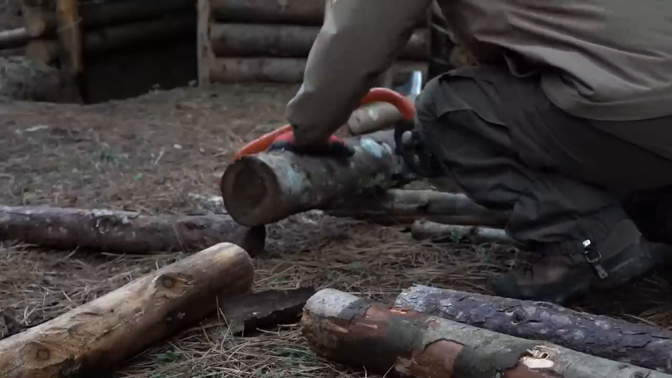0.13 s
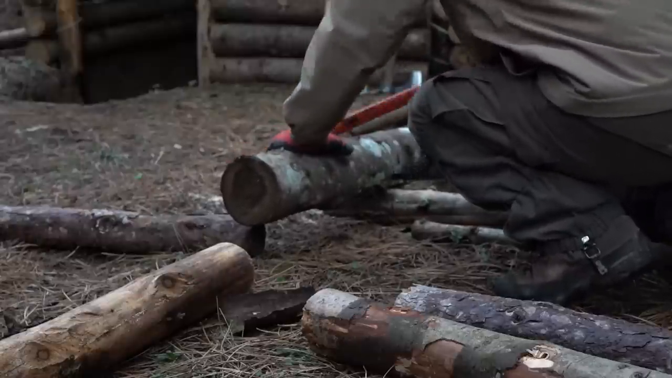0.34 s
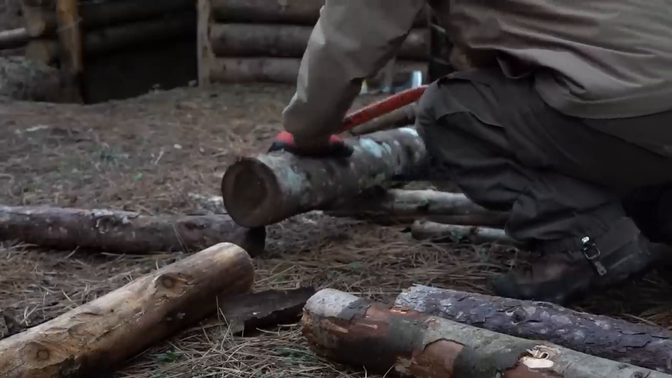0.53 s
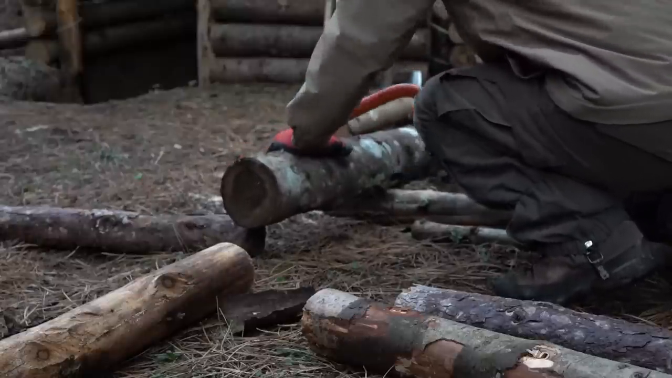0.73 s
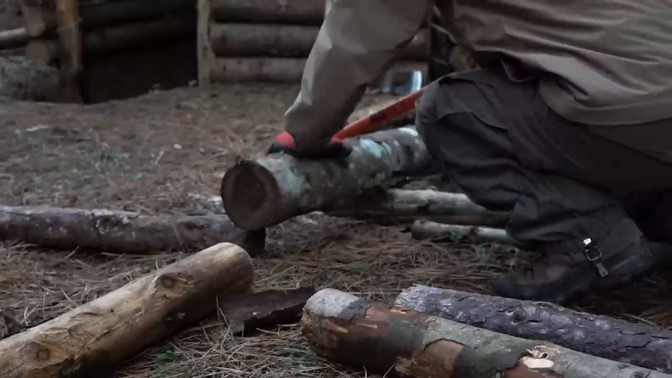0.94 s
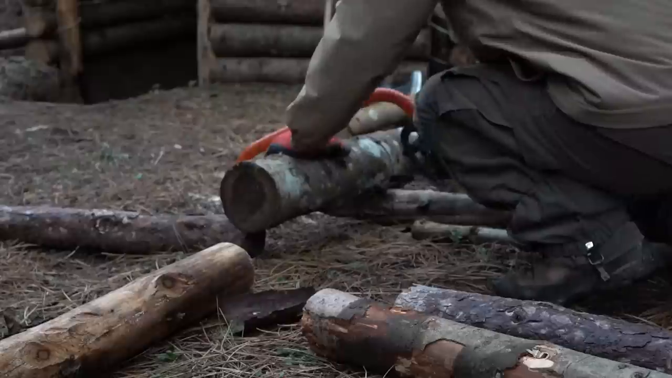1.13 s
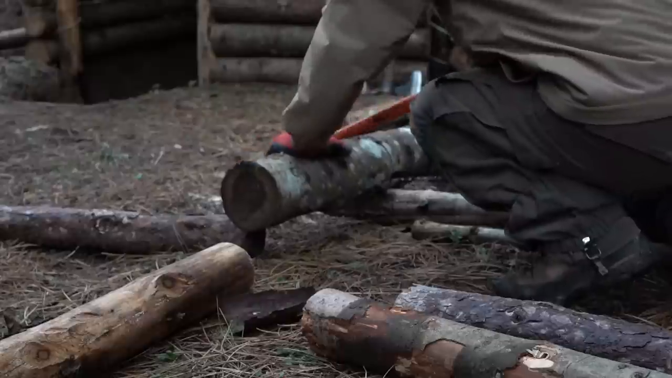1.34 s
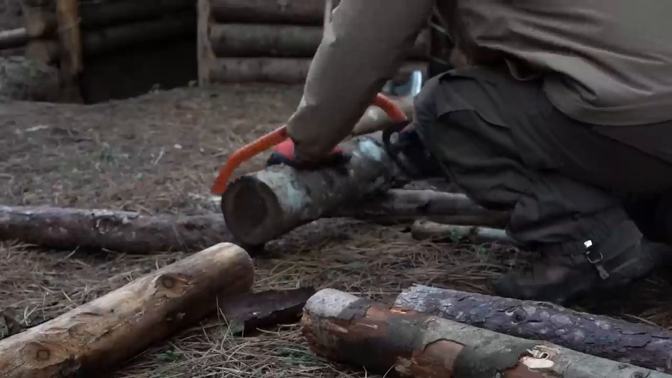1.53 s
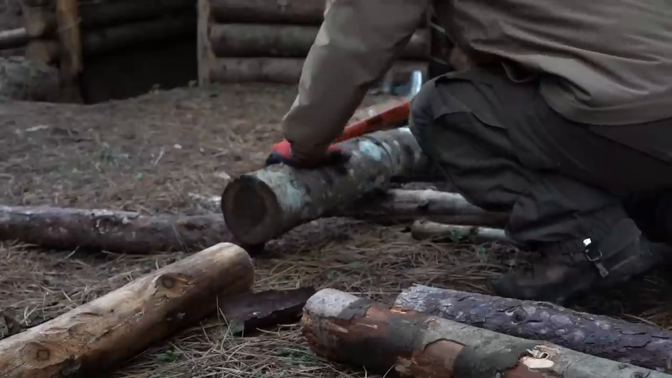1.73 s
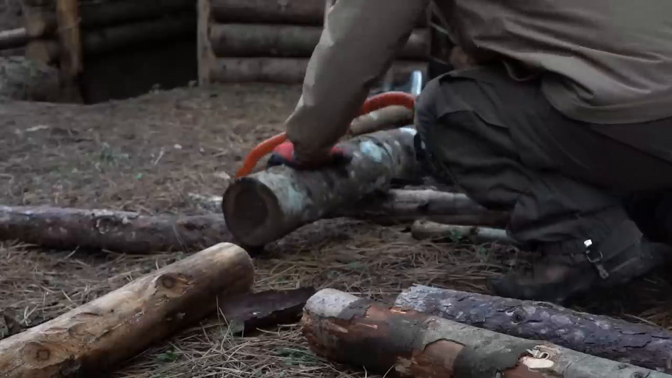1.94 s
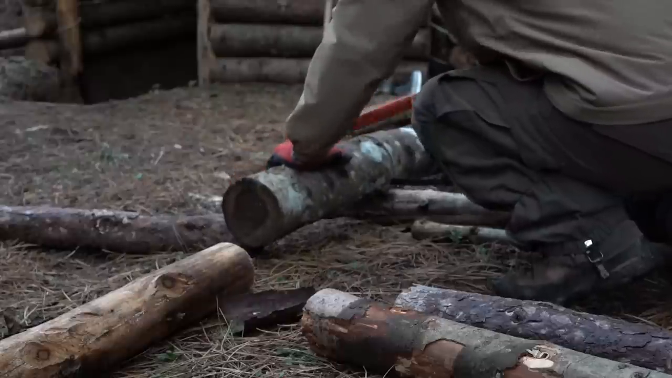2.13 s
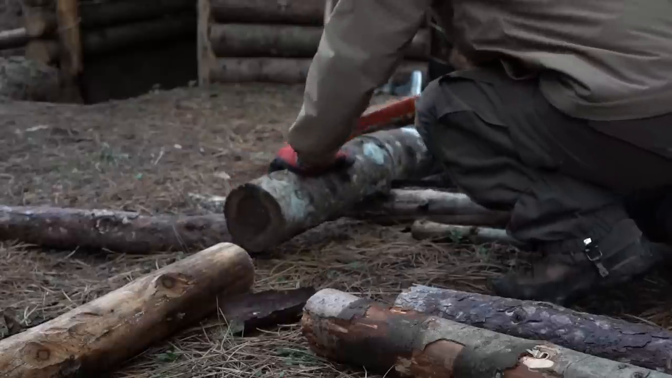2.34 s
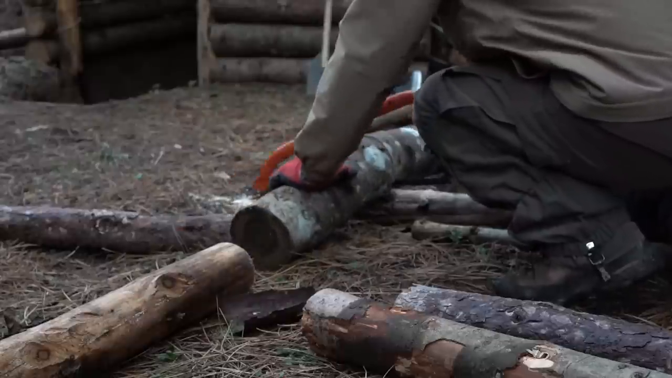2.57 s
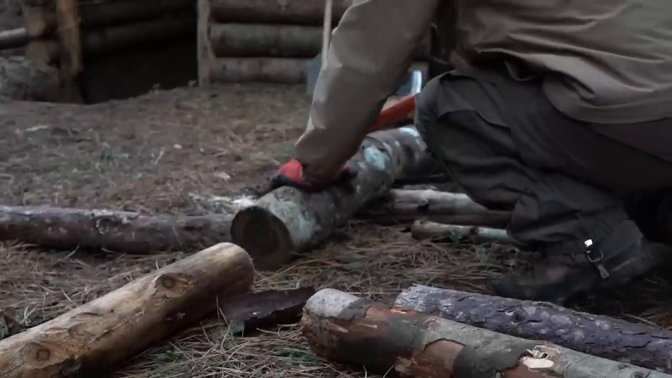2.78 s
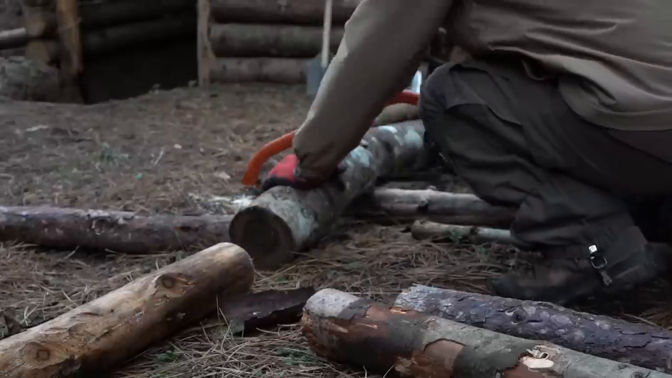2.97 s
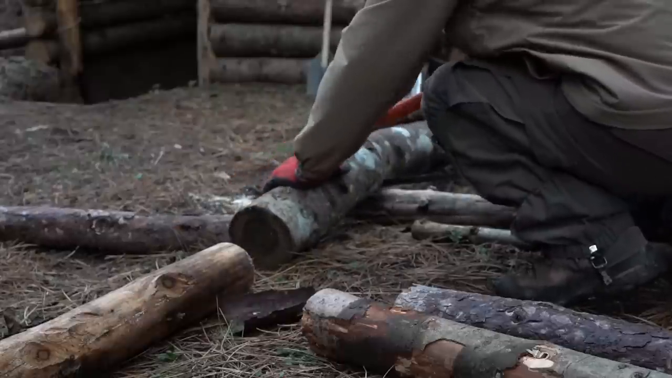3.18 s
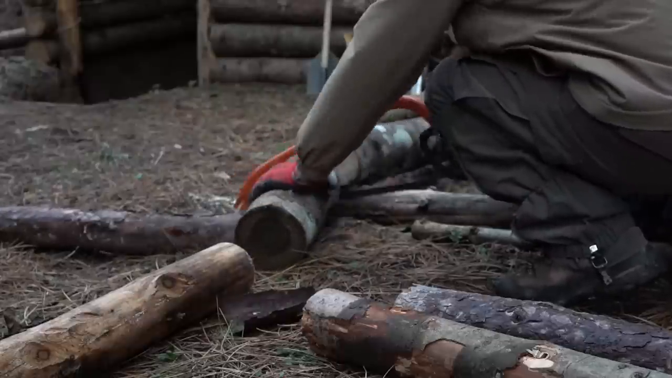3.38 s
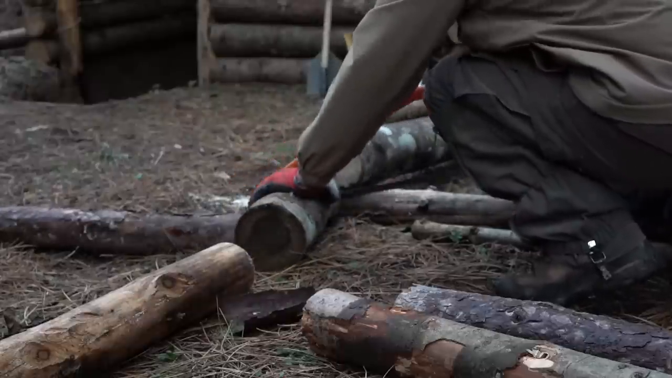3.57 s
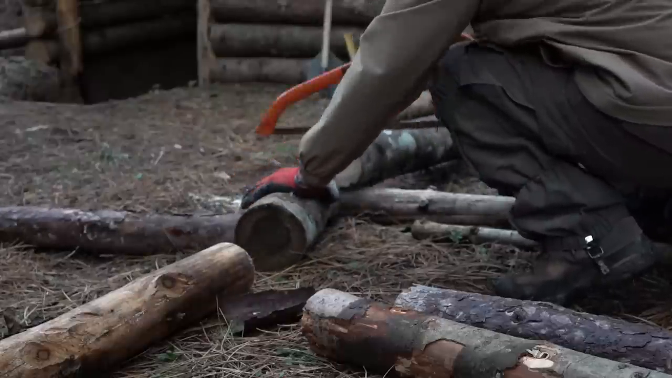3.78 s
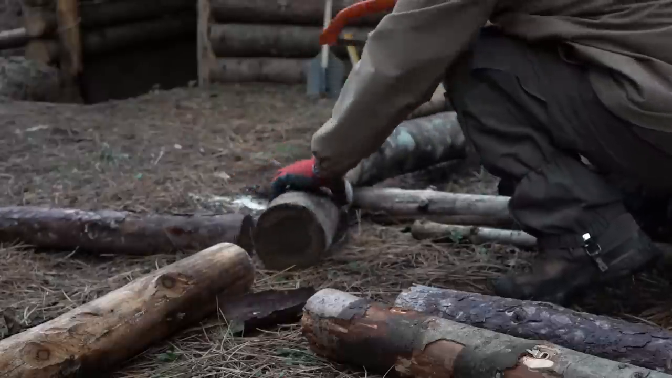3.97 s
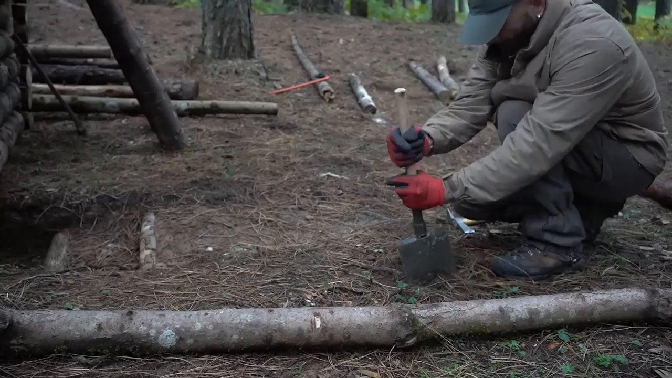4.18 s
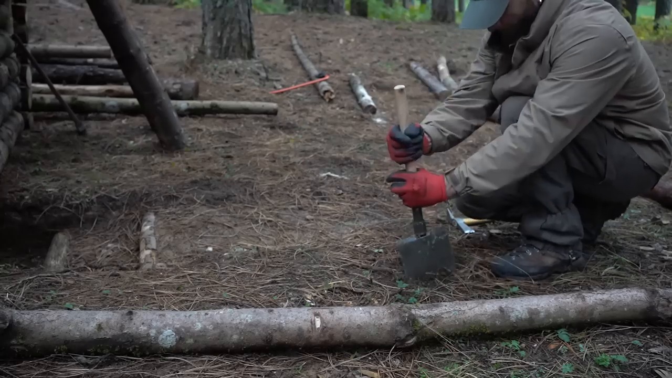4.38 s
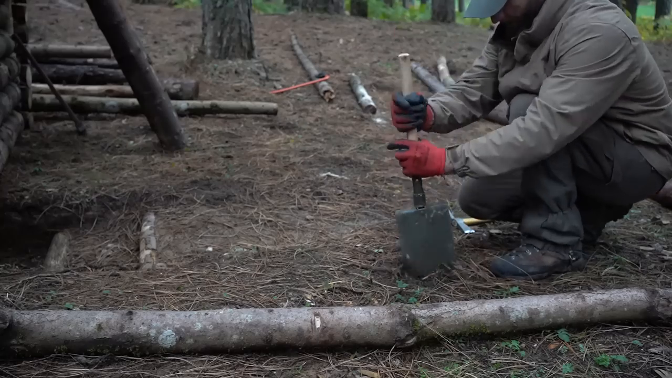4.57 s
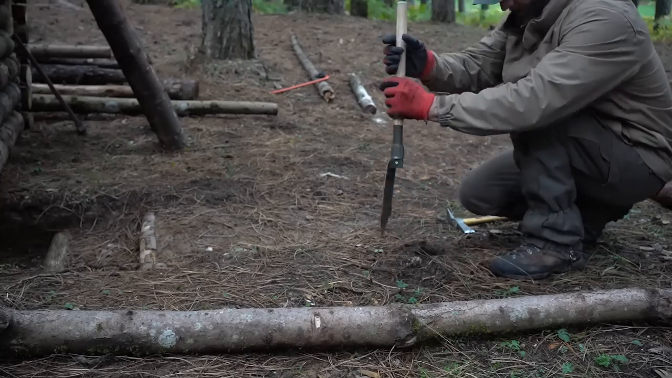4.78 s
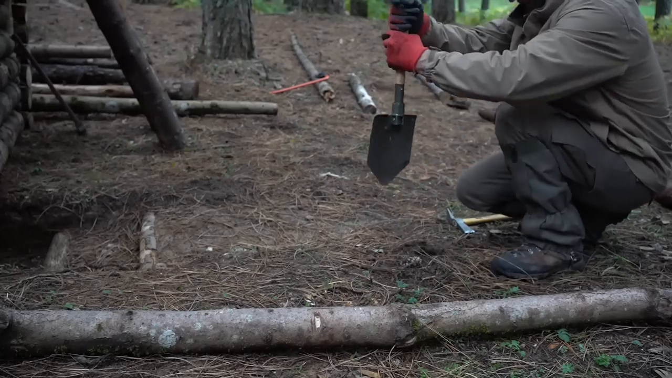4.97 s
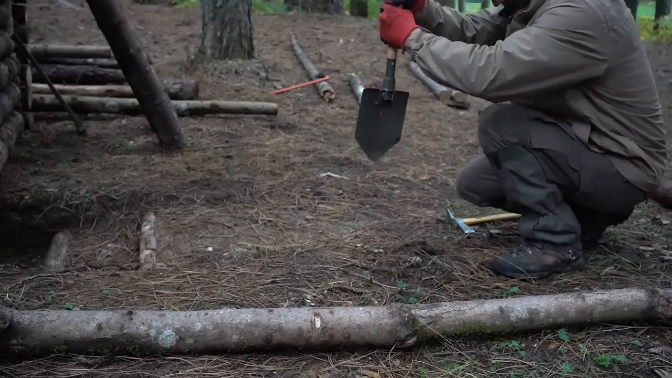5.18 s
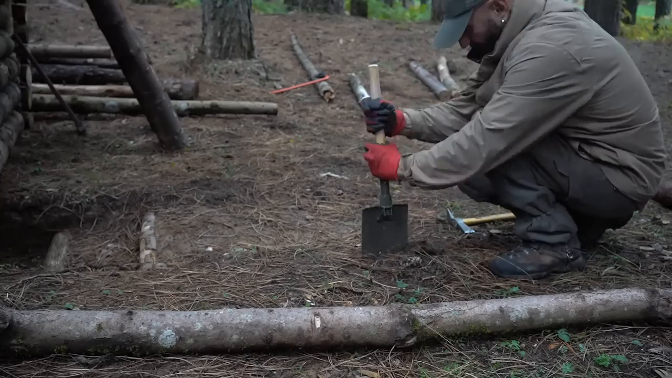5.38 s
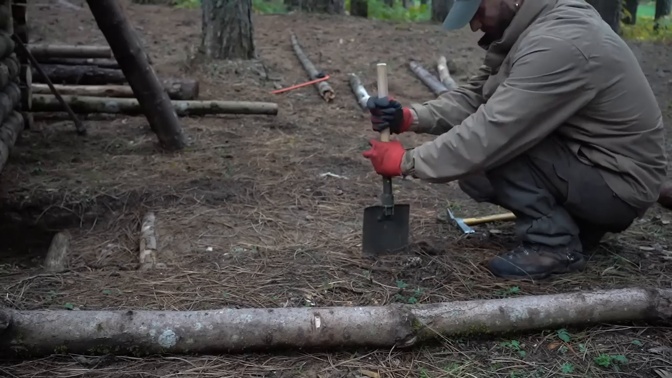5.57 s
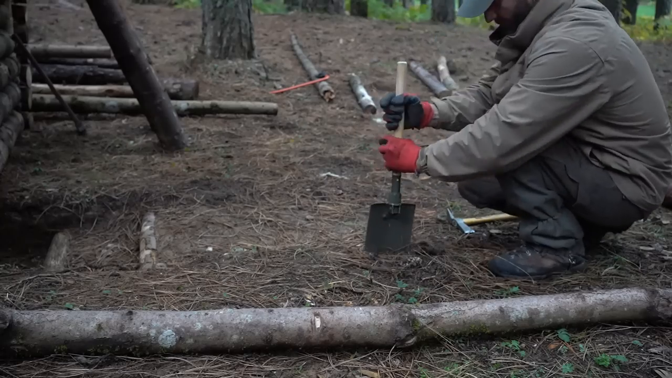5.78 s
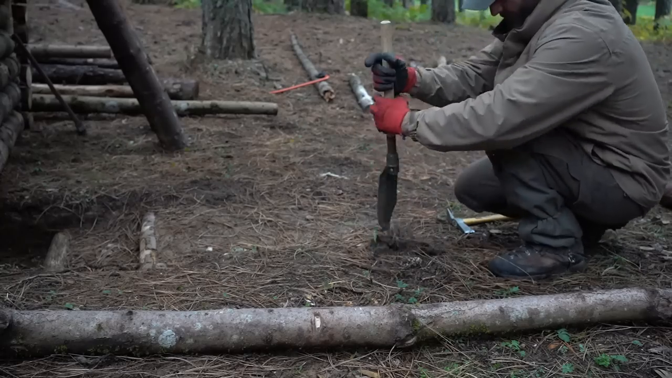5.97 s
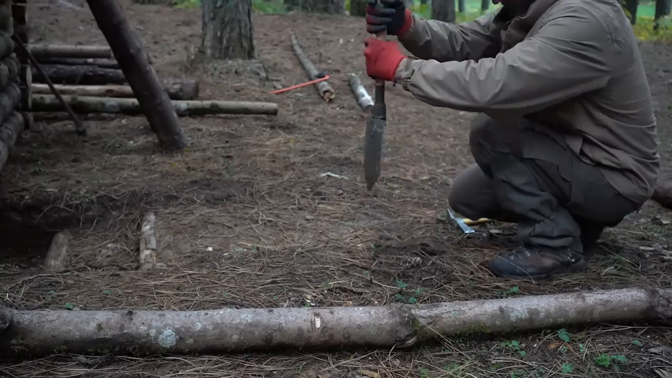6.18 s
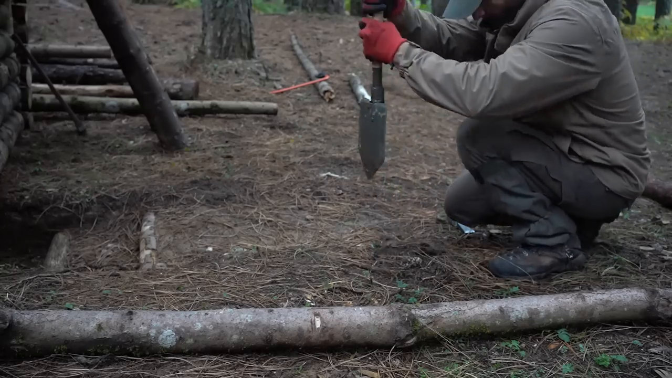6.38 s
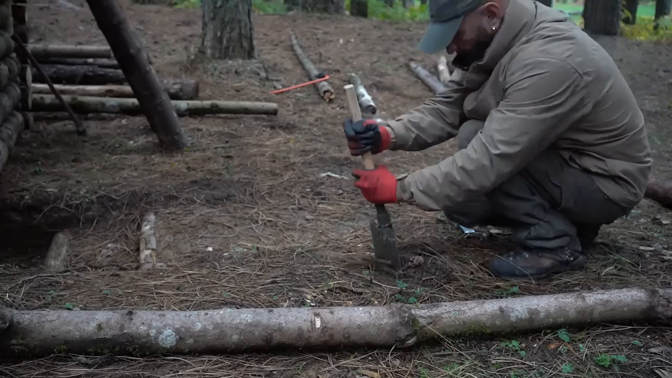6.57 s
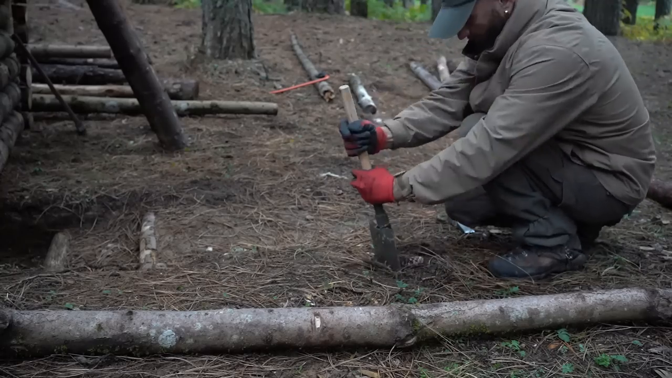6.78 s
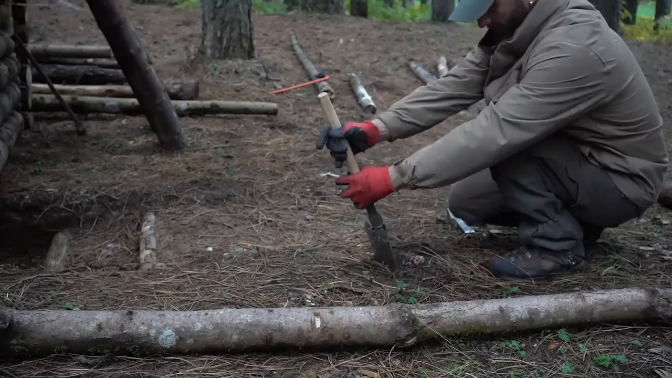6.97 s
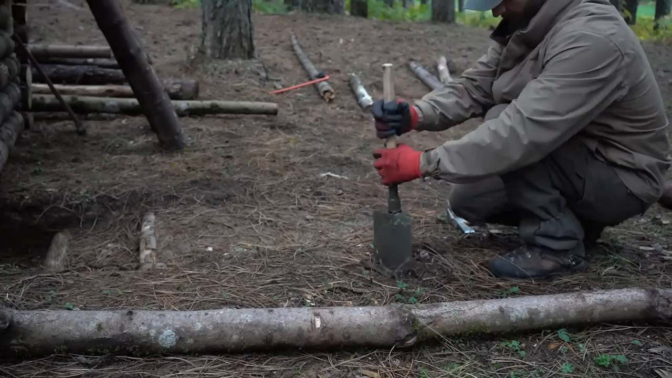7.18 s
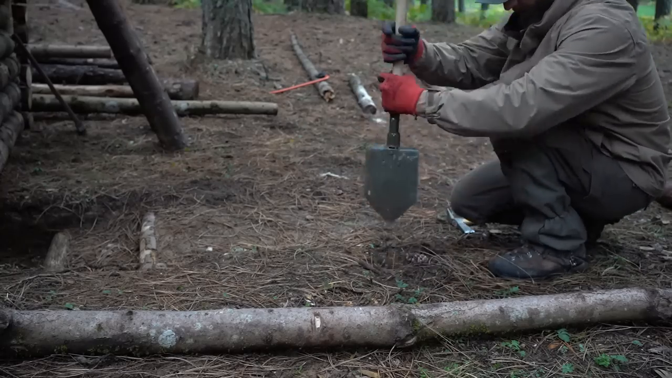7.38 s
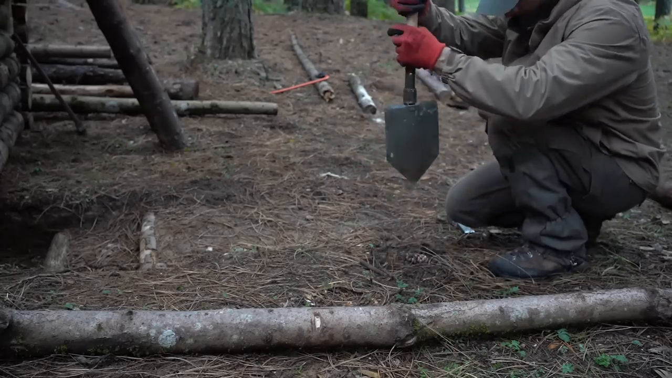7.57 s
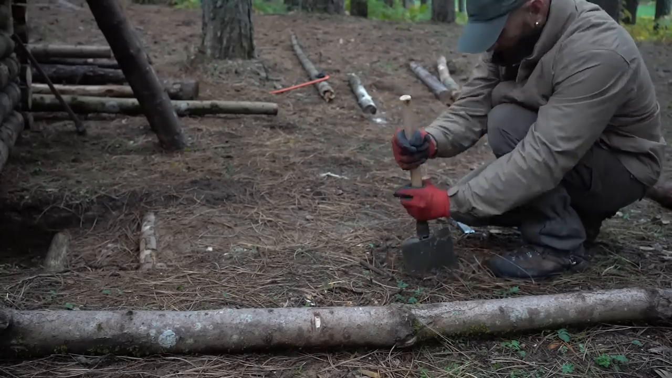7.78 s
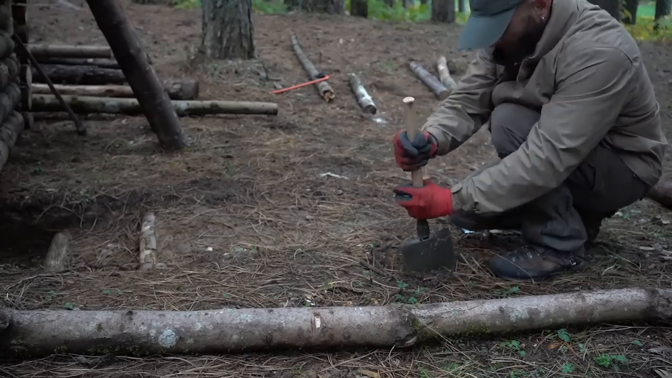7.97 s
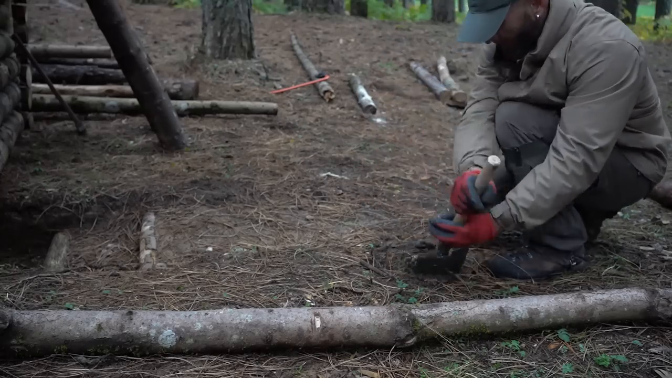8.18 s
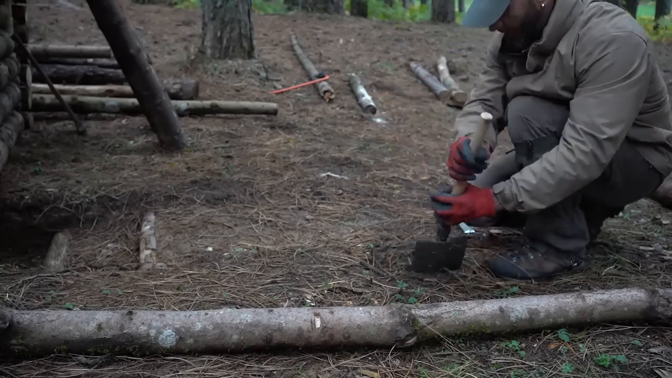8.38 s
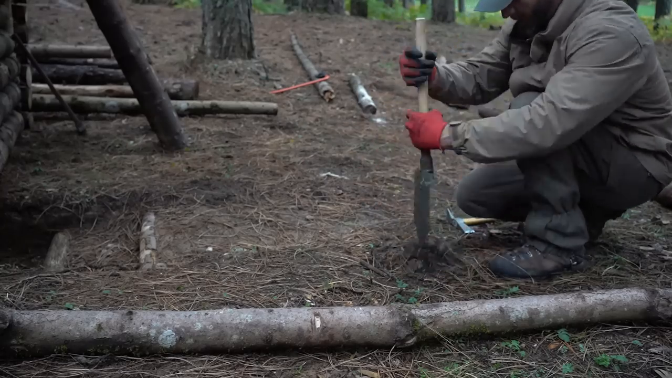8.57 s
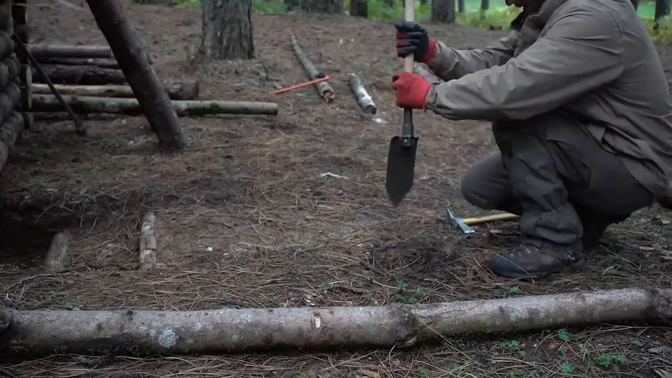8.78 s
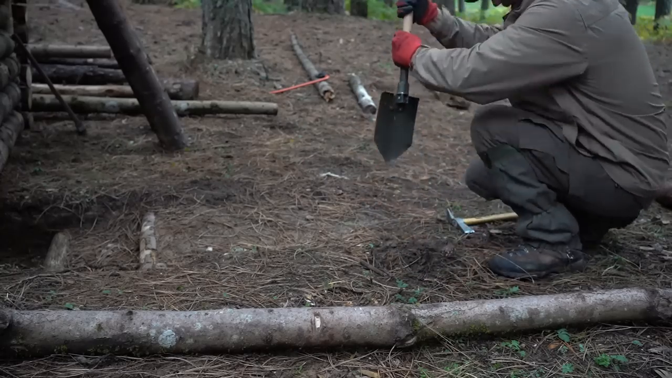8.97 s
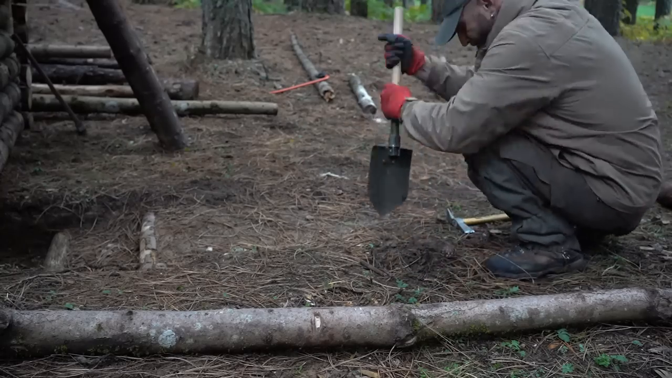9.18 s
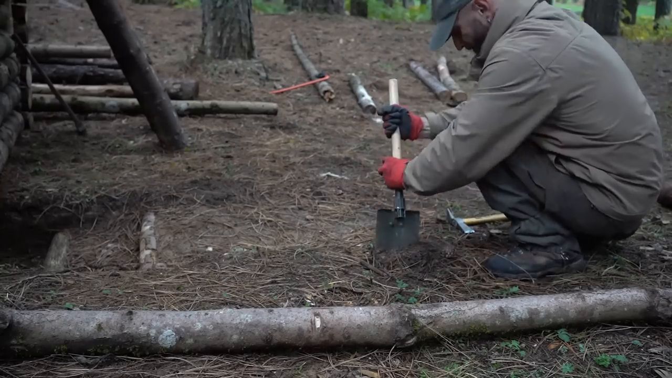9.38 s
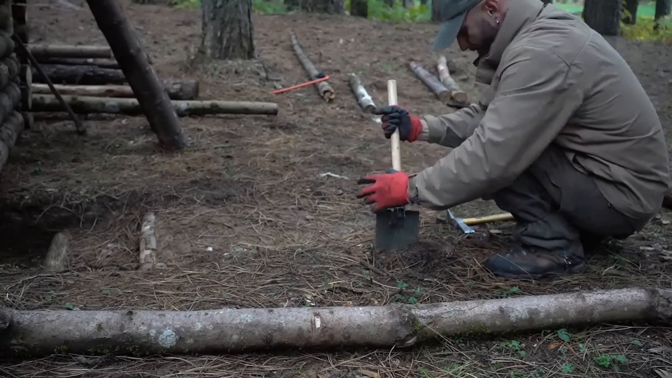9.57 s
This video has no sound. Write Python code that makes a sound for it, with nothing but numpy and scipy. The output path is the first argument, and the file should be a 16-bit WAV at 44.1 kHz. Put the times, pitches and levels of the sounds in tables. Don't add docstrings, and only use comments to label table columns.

```python
import sys
import numpy as np
from scipy import signal
from scipy.fft import rfft, irfft, next_fast_len
from scipy.io import wavfile
from scipy.ndimage import uniform_filter1d

SR = 44100
rng = np.random.default_rng(int(sys.argv[2]) if len(sys.argv) > 2 else 0)


def pcm_store(signal):
    levels = np.round(np.clip(np.atleast_2d(signal), -1, 1) * 32767)
    wavfile.write(sys.argv[1], SR, levels.astype(np.int16).T)


def boost(x):
    u = np.asarray(x, float) / 20
    return 10 ** u


N = 424241

# [f/Hz, density/dB per Hz]
GRIT_SPECTRUM = [(1290, -10), (2500, -5.5), (4710, -8), (6160, -13.5), (7980, -6.5), (10300, -32),
                 (11600, -19.5), (16200, -26)]
# [f/Hz, level/dB]
BLADE_COLOUR = [(1500, -6), (2400, -6), (3200, 1), (8500, -1.5), (10300, -21), (13000, -1), (16300, 1)]


def evened(x):
    return x / np.sqrt(np.mean(x ** 2) + 1e-20)


def add(mix, s, sound):
    part = mix[max(round(s * SR), 0):][:len(sound)]
    part += sound[:len(part)]


def coloured(x, points):
    hz, db = np.transpose(points)
    size = next_fast_len(len(x))
    f = np.fft.rfftfreq(size, 1 / SR)
    gain = boost(np.interp(np.log(f + 1), np.log(hz), db))
    return evened(irfft(rfft(x, size) * gain, size)[:len(x)])


def wander(per_s, size=N):
    step = int(SR / per_s)
    knots = rng.standard_normal(N // step + 2)
    return np.interp(np.arange(size) / step, np.arange(len(knots)), knots)


def resonate(x, hz, width):
    turn = np.exp(2j * np.pi * np.cumsum(hz) / SR)
    r = np.exp(-np.pi * width / SR)
    return 2 * (turn * signal.lfilter([1 - r], [1, -r], x * turn.conj())).real


def body(x, modes, wander_db, drift=0.027):
    out = np.zeros(len(x))
    for hz, width, db in modes:
        level = boost(db + wander_db * wander(24.934, size=len(x)))
        pitch_hz = hz * (1 + drift * wander(9, size=len(x)))
        out += level * resonate(x, pitch_hz, width)
    return evened(out)


def grains(size, per_s, spread_db, smooth):
    hit = rng.random(size) < per_s / SR
    strength = boost(spread_db * np.minimum(rng.exponential(1, size), 3.2))
    clicks = hit * strength * rng.standard_normal(size)
    return evened(clicks + 1e-9) + smooth * rng.standard_normal(size)


def ring(modes, db):
    t = np.arange(SR // 2) / SR
    out = np.zeros(len(t))
    for hz, mode_db, t60 in modes:
        quiver_db = 2.2 * np.interp(t, np.linspace(0, t[-1], 30), rng.standard_normal(30))
        sine = np.sin(2 * np.pi * (hz * t + rng.random()))
        out += boost(mode_db + quiver_db - 60 * t / t60) * sine
    return boost(db) * out * np.minimum(t / 0.00033, 1)


def burst(db, low_db, high_db, t60, rise, tail_db, tail_t60, hold=0):
    # [f/Hz, level/dB]
    capsule = [(100, 18), (400, 10.5), (1500, 6.5), (4000, 6.5), (8200, 11), (10300, 5.5), (15000, 6.5),
               (16300, 1)]
    t = np.arange(SR // 4) / SR
    grit = coloured(grains(len(t), 5000, 1., 1.), capsule)
    out = np.zeros(len(t))
    for edges, level_db, slow in (((170, 1200), low_db, 1.6), ((1200, 7000), 0, 1), ((7000, 16300), high_db, .6)):
        sos = signal.butter(N=2, Wn=edges, btype="band", fs=SR, output="sos")
        band = evened(signal.sosfilt(sos, grit))
        crunch = boost(-60 * np.maximum(t - hold, 0) / (t60 * slow))
        crumbs = boost(tail_db / min(slow, 1) - 60 * t / tail_t60)
        swell = np.minimum(t / (rise * max(slow, 1)), 1) ** 2
        out += band * boost(db + level_db) * (crunch + crumbs) * swell
    return out


def thump(db, hz, t60):
    t = np.arange(SR // 4) / SR
    out = np.zeros(len(t))
    for ratio, gain in ((1, 1), (1.423, 0.64), (1.97, -.45), (2.45, 0.31)):
        out += gain * np.sin(2 * np.pi * ratio * hz * t)
    return boost(db - 60 * t / t60) * np.minimum(t / .0015, 1) * out


def rattle(db, hz, high_db):
    t = np.arange(SR // 10) / SR
    hiss = coloured(rng.standard_normal(len(t)), GRIT_SPECTRUM) * boost(high_db - 10.0 - 60 * t / 0.013)
    rough = evened(resonate(rng.standard_normal(len(t)), hz + 0 * t, 520))
    knock = (np.sin(2 * np.pi * hz * t) + 0.43 * rough) * boost(-2.0 - 60 * t / 0.018)
    return boost(db) * (knock + hiss) * np.minimum(t / 0.00049, 1)


def stroke_db(t, s, length, rise, fall, db, swell_db, arch_db=0):
    times = [s - 3 * rise, s, s + length / 2, s + length, s + length + 3 * fall]
    middle_db = db + swell_db / 2 + arch_db / 2
    return np.interp(t, times, [db - 112, db - arch_db, middle_db, db + swell_db - arch_db, db + swell_db - 93])


def saw_strokes(t):
    # [t/s, length/s, rasp level/dB, swell over the stroke/dB]
    strokes = [(0, 0.1, -40, -1.5), (0.129, 0.11, -19, -3), (0.345, 0.1, -31.5, 3.5),
               (0.596, 0.068, -20.5, 1), (0.8, 0.11, -37, 5), (1.047, 0.091, -25, 2.5),
               (1.266, 0.096, -35, 3), (1.502, 0.11, -22, 0), (1.712, 0.1, -24.5, -6.5),
               (1.948, 0.099, -19.5, -4), (2.17, 0.091, -29, -1), (2.362, 0.15, -23, 5),
               (2.595, 0.105, -26.5, 1.5), (2.825, 0.081, -23, -0.5), (3.107, 0.053, -25.5, -7)]
    # [rise/s, fall/s, log hum f/Hz, hum relative level/dB, mid wood relative level/dB]
    pull = (0.24, 0.13, 298, -1, -3.5)
    push_stroke = (0.17, 0.0451, 335, -6.5, -6)
    touches = (-0.03, 0.15, 0.39, 0.6, 0.83, 1.04, 1.245, 1.52, 1.73, 1.93, 2, 2.5, 2.5, 2.787, 3)
    # [t/s, length/s, rasp level/dB, swell/dB, fall/s]
    drags = [
        (3.255, 0.028, -40, 5.5, .01),
        (3.349, 0.1, -33, -16, .027),
        (3.47, 0.22, -33.5, -23.5, .099),
        (3.738, 0.18, -40, -17, .061),
        (3.934, 0.135, -57, 12, .008),
    ]
    # [rise/s, log hum f/Hz, hum relative level/dB, mid wood relative level/dB]
    drag = (0.02, 281, -9.5, -7.5)
    coarse = t[::50]
    levels, voices, turns = [], [], []
    for k, ((s, length, db, swell_db), touch) in enumerate(zip(strokes, touches)):
        rise, fall, hum_hz, hum_db, wood_db = (pull, push_stroke)[k % 2]
        lift_db = np.clip(2500 * (touch - coarse), 0, 9)
        levels.append(stroke_db(coarse, s, length, rise, fall, db, swell_db, 2) - lift_db)
        through_db = -16 * (s > 2.55)
        voices.append((hum_hz, hum_db + through_db, wood_db))
        turns += [s, s + length + fall]
    for s, length, db, swell_db, fall in drags:
        levels.append(stroke_db(coarse, s, length, drag[0], fall, db, swell_db))
        voices.append(drag[1:])
    levels = np.array(levels)
    active = np.repeat(levels.argmax(axis=0), 50)[:len(t)]
    voice = uniform_filter1d(np.array(voices, float)[active], size=400, axis=0).T
    power = boost(2 * np.interp(t, coarse, levels.max(axis=0)))
    keep = np.exp(-1 / (0.018 * SR))
    push = np.sqrt(power + boost(-38.0) * signal.lfilter([1 - keep], [1, -keep], power))
    return push, turns, voice


def blade_rasp(teeth, t):
    # [f/Hz, density/dB per Hz]
    rasp_spectrum = [(1290, -24), (2300, -14), (3500, -3), (5000, -9), (8250, -3), (10300, -23),
                     (15000, -15), (16300, -19)]
    # [f/Hz, width/Hz, level/dB]
    blade = [(3230, 40, 6.5), (3910, 115, 4), (4520, 140, 5.5), (4730, 37, 9.5), (5200, 110, 1.5),
             (5680, 98, 2.5), (6830, 77, 2), (7520, 81, 7), (8170, 57, 10)]
    # [f/Hz, width/Hz, level/dB]
    squeak_modes = [(1900, 54, 13), (3430, 200, 6), (4120, 60, 8), (5250, 40, 5), (7200, 60, -1),
                    (8390, 200, 2), (14000, 40, 5), (14600, 200, 2)]
    ringing = coloured(body(teeth, blade, 5.5, .006), BLADE_COLOUR)
    squeak = coloured(body(teeth, squeak_modes, 3.5, .003), BLADE_COLOUR)
    skim = np.exp(-((t - 3.8) / 0.1) ** 2)
    return evened(coloured(teeth, rasp_spectrum) + 0.6 * ringing) + 1.2 * skim * squeak


def blade_whine(teeth, t, turns):
    span_hz = np.interp(t, turns, np.resize([3600, 5300, 5300, 3600], len(turns)))
    span_hz = span_hz * boost(.8 * wander(60)[:len(t)])
    whine = evened(resonate(resonate(teeth, span_hz, 1300), span_hz, 1300))
    pinch_db = 18.5 * np.exp(-((t - 2.862) / 0.023) ** 2)
    return boost(-9 + pinch_db) * whine


def log_hum(size, hum_hz):
    # [f/Hz, width/Hz, level/dB]
    log_modes = [(232, 17, -34), (354, 24, 19.5), (512, 100, 13.5)]
    shake = grains(size, 600, 2.2, 0.48)
    hum = evened(resonate(resonate(shake, hum_hz, 94), hum_hz, 190)) + 0.66 * body(shake, log_modes, 8.3)
    return evened(coloured(hum, [(120, -31), (200, 3.5), (700, -2.0)]))


def saw():
    # [f/Hz, width/Hz, level/dB]
    wood_modes = [(510, 70, 5), (662, 45, 4), (888, 40, 7), (1150, 55, 2), (1630, 100, 7), (1885, 200, -4),
                  (2420, 140, -4)]
    size = int(4.2 * SR)
    t = np.arange(size) / SR
    push, turns, (hum_hz, hum_db, wood_db) = saw_strokes(t)
    teeth = grains(size, 8000, 1.8, 1.2)
    flutter = boost(1.9 * wander(150)[:size])
    rasp = blade_rasp(teeth, t) + blade_whine(teeth, t, turns)
    wood = body(teeth, wood_modes, 3.5, .02) * boost(wood_db + 0.5)
    dust_spectrum = [(7000, -46), (9000, -32), (11000, -4), (15000, 10.5), (16300, 8.5)]
    dust = coloured(grains(size, 8000, 2.5, 0.51), dust_spectrum)
    hum = boost(hum_db) * log_hum(size, hum_hz)
    sound = push * (flutter * (rasp + wood + boost(-7) * dust) + hum)
    return np.pad(sound, (0, N - size))


def ground():
    # [t/s, level/dB]
    sway = [
        (0.0, -47),
        (0.24, -37),
        (1.5, -53.5),
        (1.62, -40),
        (2.37, -55),
        (2.5, -34),
        (3.1, -42),
        (3.55, -37.5),
        (4.12, -58),
    ]
    # [t/s, level/dB, f/Hz]
    waves = [
        (4.24, -19.5, 45.5),
        (5.453, -22, 48.1),
        (6.593, -22, 45.2),
        (7.849, -17, 44.4),
        (9.306, -25.5, 44),
    ]
    times, levels_db = np.transpose(sway)
    sway_db = np.interp(np.arange(N) / SR, times, levels_db, right=-120, left=-120)
    out = body(rng.standard_normal(N), [(46, 19, 5), (36, 10, -14)], 4.) * boost(sway_db)
    t = np.arange(SR // 2) / SR
    for s, db, hz in waves:
        shiver = boost(db - 4.5 - 60 * t / 0.33) * np.sin(2 * np.pi * 84 * t)
        add(out, s - .02, shiver)
        wave = np.sin(2 * np.pi * hz * t) - 0.74 * np.sin(2 * np.pi * (hz - 11) * t)
        add(out, s, -boost(db - 60 * t / 0.56) * np.minimum(t / 0.0077, 1) * wave)
    return out


def forest_air():
    # [f/Hz, density/dB per Hz]
    air_spectrum = [(25, -2), (74, -6), (237, -10.5), (480, -14), (1270, -15.5), (14600, -33.5),
                    (16200, -33)]
    return boost(-49.5) * coloured(rng.standard_normal(N), air_spectrum)


def fibre_snaps():
    # [t/s, peak/dB, highs relative level/dB]
    snaps = [(0.058, -18.5, -4), (0.294, -17.5, -3), (0.6274, -7, -23), (1.5289, -7, 3.5),
             (1.5754, -1.5, -14), (1.6686, -18, -10), (1.8279, -4, -5), (2.404, 6, -5), (2.504, 1.5, -4),
             (2.926, -16, 0), (2.9493, 1, -4), (3.051, -16, -11), (3.3088, 5.5, -11), (3.3206, 5, -24),
             (3.466, 5.5, 2.5), (3.5365, -7, 6)]
    out = np.zeros(N)
    for s, db, high_db in snaps:
        add(out, s, burst(db - 8.0, -16.5, high_db, 0.014, 0.00052, -15.0, 0.081))
    return out


def teeth_bites():
    # [t/s, peak/dB]
    bites = [
        (0.102, -11.5),
        (0.3424, -15.5),
        (0.5685, -9),
        (1.0306, -10),
        (1.4679, -10.5),
        (1.71, -14.5),
        (1.918, -11),
        (1.95, -15.5),
        (2.812, -12.5),
        (3.0637, -13.5),
    ]
    out = np.zeros(N)
    for s, db in bites:
        add(out, s - .004, burst(db - 5.5, -13, -7, 0.032, 0.005, -23, .1, .012))
    return out


def log_knocks():
    # [t/s, peak/dB, f/Hz]
    knocks = [(0.247, -26, 89), (0.452, -13, 204), (.91, -18, 211), (1.612, -27, 93), (1.811, -18, 204),
              (2.28, -26.5, 206), (2.506, -25.5, 89), (2.702, -14.5, 210.5), (2.96, -28, 188),
              (3.172, -23.5, 194), (3.308, -18, 210), (3.58, -33.5, 135)]
    out = np.zeros(N)
    for s, db, hz in knocks:
        add(out, s, thump(db, hz, 0.1))
    return out


def cut_end_drop():
    # [f/Hz, level/dB, t60/s]
    cracked = [(221, 0, .3), (404, -9, .25), (598, -10, .3), (829, -5, .12), (1055, -10, .2),
               (1389, -16, .2)]
    # [t/s, level/dB]
    drops = [
        (3.327, -24),
    ]
    out = np.zeros(N)
    for s, db in drops:
        add(out, s, ring(cracked, db))
    return out


def freed_blade():
    # [f/Hz, level/dB, t60/s]
    freed = [(3300, -10, .15), (4698, 1, 0.4), (4757, 5, 0.18), (4874, 4, 0.5), (5360, -10, .11),
             (6800, -14, .15), (8400, -13, .15), (13710, -7, .06)]
    # [t/s, level/dB]
    clinks = [
        (3.467, -35),
        (3.537, -42),
    ]
    out = np.zeros(N)
    for s, db in clinks:
        add(out, s, ring(freed, db))
    return out


def twigs():
    # [t/s, peak/dB, f/Hz]
    twig_snaps = [(3.68, -35, 3400), (3.851, -35, 5180), (3.961, -37, 2010), (3.98, -32, 3580),
                  (4.017, -34, 7820), (4.04, -32, 8540), (4.065, -35, 3500), (4.545, -36, 7550),
                  (4.799, -35, 977), (5.506, -28, 3040), (5.789, -30, 2200), (5.843, -35, 1100),
                  (5.892, -34, 2550), (6.852, -29, 1130), (6.875, -22.5, 1030), (7.049, -33, 1150),
                  (7.069, -32, 1090), (7.094, -25.5, 2760), (7.128, -33, 1500), (7.206, -29, 7090),
                  (7.422, -32.5, 3200), (8.215, -28, 4500), (8.314, -24, 8230), (8.373, -18.5, 1630),
                  (8.403, -32, 3000), (8.522, -32, 2000), (8.574, -38, 4000), (8.6715, -30, 4500),
                  (8.835, -33.5, 1800), (9.135, -41, 2220), (9.168, -26, 1040), (9.412, -34, 1500)]
    out = np.zeros(N)
    for s, db, hz in twig_snaps:
        add(out, s, rattle(db, hz, 6))
    return out


def soil_rubs():
    # [t/s, length/s, hiss level/dB, soil breaking relative level/dB]
    rubs = [(4.108, 0.12, -56.5, 10), (4.567, 0.028, -39.5, -1), (4.667, 0.096, -52.5, 1),
            (4.796, 0.04, -44.5, -3), (4.865, 0.15, -50.5, -1), (5.337, 0.095, -62.5, 8.5),
            (5.505, 0.14, -50.5, -2.5), (5.676, 0.18, -48, -7.5), (5.794, 0.054, -45, -5),
            (5.895, .05, -41.5, -8), (6.11, 0.22, -54, 0), (6.47, 0.19, -52.5, 4.5),
            (6.866, 0.097, -41.5, -0.5), (7.037, 0.22, -44.5, -1), (7.416, 0.074, -46, -4),
            (7.772, 0.099, -44, 5.5), (8.128, 0.19, -40, -2.5), (8.363, 0.059, -37.5, -7),
            (8.46, 0.29, -47.5, -0.5), (8.772, 0.35, -58, -0.5), (9.18, 0.16, -51, 8),
            (9.322, 0.12, -42, -5)]
    # [f/Hz, density/dB per Hz]
    crumb_spectrum = [(80, -50), (200, 7), (450, -8), (900, -6), (1500, -0.5), (2500, -22), (5000, -26),
                      (10000, -57)]
    t = np.arange(N) / SR
    levels = [stroke_db(t[::50], s, length, 0.059, 0.075, db, crumb_db) for s, length, db, crumb_db in rubs]
    power = boost(2 * np.array(levels))
    hiss = np.sqrt(np.interp(t, t[::50], power.sum(axis=0)))
    crumble = np.sqrt(np.interp(t, t[::50], boost(2 * np.array(rubs)[:, -1]) @ power))
    needles = coloured(grains(N, 2500, 2.2, 1.2), GRIT_SPECTRUM)
    breaks = grains(N, 280, 2.5, .7)
    pitch_hz = 950 * boost(1.6 * wander(40))
    dull = coloured(breaks + .6 * rng.standard_normal(N), crumb_spectrum)
    crumbs = evened(dull + 1.2 * evened(resonate(breaks, pitch_hz, 350)))
    return needles * hiss * boost(2.2 * wander(70)) + crumbs * crumble * boost(3. * wander(50))


def shovel_ticks():
    # [t/s, peak/dB, f/Hz]
    ticks = [(4.125, -23, 700), (4.15, -28, 535), (4.204, -23, 1800), (4.578, -12.5, 1110),
             (4.58, -13, 1780), (4.582, -14.5, 2600), (4.905, -27, 885), (5.296, -36, 900),
             (5.349, -21, 830), (5.364, -21, 740), (5.397, -17.5, 910), (5.495, -20, 1400),
             (6.032, -37, 750), (6.206, -30, 836), (6.246, -25.5, 645), (6.553, -15, 800),
             (6.514, -23, 520), (7.06, -27, 288), (7.178, -25.5, 380), (7.424, -34, 800), (7.744, -34, 869),
             (7.781, -34, 810), (7.812, -18, 1200), (8.13, -27, 1480), (8.176, -19, 694), (8.505, -21, 645),
             (8.636, -29, 1210), (8.652, -34, 1300), (8.68, -31, 1660), (9.009, -28.5, 750),
             (9.088, -38, 654), (9.234, -23, 900), (9.333, -17.5, 1510), (9.532, -33.5, 1700),
             (9.582, -35, 1300)]
    out = np.zeros(N)
    for s, db, hz in ticks:
        add(out, s, rattle(db, hz, -20))
    return out


def shovel_stabs():
    # [t/s, peak/dB, lows relative level/dB, highs relative level/dB, t60/s]
    stabs = [
        (4.2125, -9, 0, -6.5, 0.042),
        (5.43, -4.5, -3.5, -5, 0.045),
        (6.566, -7, -6, -6, 0.049),
        (7.826, -10, 4.5, -6.5, 0.047),
        (9.2751, -8.5, -9, 2.5, 0.072),
    ]
    sinks = (.015, 0.0039, 0.016, 0.0058, 0.0056)
    out = np.zeros(N)
    for (s, db, low_db, high_db, t60), sink in zip(stabs, sinks):
        add(out, s - .002, burst(db - 3.5, low_db, high_db, t60, 0.0048, -23, 0.44, sink))
    return out


def root_strikes():
    # [t/s, peak/dB, f/Hz, t60/s]
    barks = [(4.216, -9, 1860, .03), (4.225, -10, 1600, 0.042), (4.225, -11, 845, .03),
             (4.225, -17, 400, .03), (4.254, -24, 700, .03), (5.432, -3, 1550, 0.019),
             (5.431, -5, 2120, .022), (5.433, -5.5, 3480, 0.017), (5.431, -10.5, 330, .03),
             (5.445, -14, 342, .04), (6.566, -8, 607, .03), (6.57, -11, 3700, .05), (6.573, -15, 2410, .04),
             (6.582, -17.5, 1100, 0.096), (7.823, -6.5, 400, 0.048), (7.827, -6, 864, 0.032),
             (7.827, -11.5, 1700, 0.034), (7.842, -9, 300, .03), (7.856, -11, 350, 0.032),
             (9.276, -13, 1710, .025), (9.283, -7, 1185, 0.074), (9.283, -14, 260, 0.082)]
    out, t = np.zeros(N), np.arange(SR // 10) / SR
    for s, db, hz, t60 in barks:
        rough = evened(resonate(rng.standard_normal(len(t)), hz + 0 * t, 290))
        bark = np.sin(2 * np.pi * hz * t) + 0.41 * rough
        add(out, s, boost(db - 60 * t / t60) * np.minimum(t / 0.0014, 1) * bark)
    return out


def soil_thuds():
    # [t/s, peak/dB, f/Hz]
    thuds = [
        (4.215, -16.5, 152),
        (5.432, -13.5, 247),
        (6.57, -24.5, 214),
        (7.827, -10, 133),
        (9.283, -21, 130),
    ]
    out = np.zeros(N)
    for s, db, hz in thuds:
        add(out, s, thump(db, hz, 0.063))
    return out


def shovel_pulls():
    # [t/s, peak/dB, lows relative level/dB, highs relative level/dB, t60/s]
    pulls = [
        (4.576, -13, -14, -17, 0.06),
        (4.59, -20.5, -25, 2, 0.05),
        (4.927, -13.5, -35, -8, 0.036),
        (5.926, -15, -20, -5, 0.032),
        (5.932, -4.5, -16.5, -8, 0.031),
        (6.245, -23.5, -17, -14, 0.026),
        (7.235, -11.5, -21, -1, 0.056),
        (8.355, -23, -20, 0, 0.032),
        (8.3654, -15, -10.5, 3, 0.034),
    ]
    out = np.zeros(N)
    for s, db, low_db, high_db, t60 in pulls:
        add(out, s - .001, burst(db - 6, low_db, high_db, t60, 0.0015, -36, 0.47))
    return out


def shovel_rings():
    # [f/Hz, level/dB, t60/s]
    blade_on = [(904, -12, .12), (1475, -11, .3), (1593, -6, .15), (2400, -5, .07), (3100, -3, .08),
                (4100, -5, .07), (4620, -6, .06), (5100, -3, .06), (5480, -8, .06), (6638, -1, .1),
                (7047, -3, .14), (7500, 7, .04), (8215, -3, .1), (12100, -2, .07)]
    edge_on = [(1701, -13, 0.086), (2078, -1, 0.056), (2600, -9, .08), (3370, -4, 0.11), (4226, -7, 0.08),
               (4689, -2, 0.069), (5426, -8, 0.071), (6148, -5, 0.053), (6702, -3, 0.08),
               (7477, -12, 0.094), (8100, -1, 0.06), (1696, -18, .5), (1475, -26, .6), (910, -10, .1)]
    half_buried = [(1787, -14, .12), (3418, -12, .1), (4600, -12, .2), (4985, -1, .11), (5850, -14, .1),
                   (6164, -4, .1), (6760, -4, .08), (7900, 7, .045), (8236, 4, .05), (11910, -5, .05)]
    soil_damped = [(2480, -8, 0.099), (3560, -40.5, 0.017), (7130, -4, 0.034), (7940, 8.5, 0.043),
                   (8700, 2.5, 0.046)]
    # [t/s, level/dB]
    blade_on_hits = [
        (4.927, -48),
        (5.931, -25),
        (8.373, -34.5),
    ]
    edge_on_hits = [
        (7.236, -23.5),
    ]
    buried_hits = [
        (4.59, -29.5),
    ]
    damped_hits = [
        (6.57, -21),
        (9.275, -13.5),
    ]
    holds = ((blade_on, blade_on_hits), (edge_on, edge_on_hits), (half_buried, buried_hits), (soil_damped, damped_hits))
    out = np.zeros(N)
    for modes, hits in holds:
        for s, db in hits:
            add(out, s, ring(modes, db))
    return out


def clearing(x):
    t = np.arange(SR // 2) / SR
    tail = rng.standard_normal(len(t)) * boost(-60 * t / 0.16) * (t > .008)
    tail = signal.lfilter([.5], [1, -.5], tail)
    return signal.oaconvolve(x, tail / np.linalg.norm(tail))[:N]


def scene():
    sawing = saw() + fibre_snaps() + teeth_bites() + log_knocks() + cut_end_drop() + freed_blade()
    digging = shovel_ticks() + shovel_stabs() + root_strikes() + soil_thuds() + shovel_pulls() + shovel_rings()
    near = sawing + twigs() + digging
    return (near + boost(-17.0) * clearing(near) + soil_rubs() + ground() + forest_air())[None]


def roll_off(x):
    return signal.sosfilt(signal.butter(12, 16400, fs=SR, output="sos"), x)


def record(dry):
    lowpass = signal.firwin(numtaps=401, cutoff=15950, window=("kaiser", 7), fs=SR)
    limited = signal.oaconvolve(dry, lowpass[None], "same")
    return roll_off(np.clip(limited, -1, 1))


dry = scene()
out = record(dry)
pcm_store(out)
```